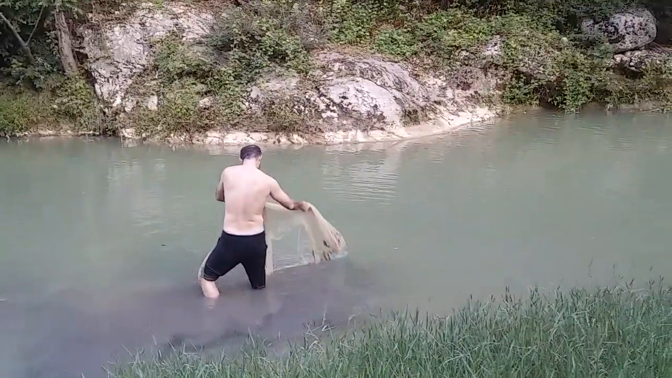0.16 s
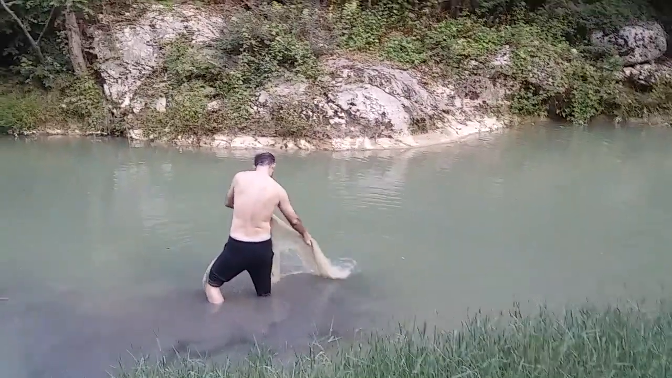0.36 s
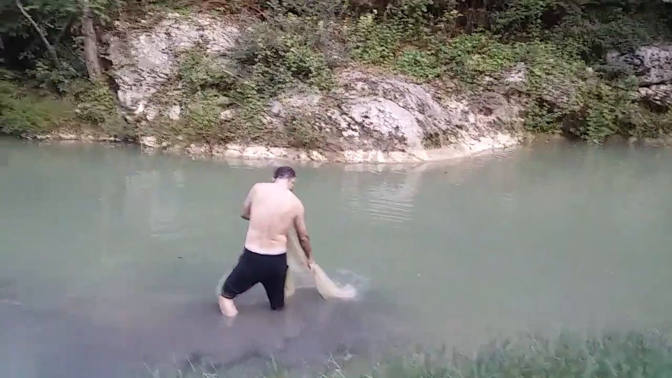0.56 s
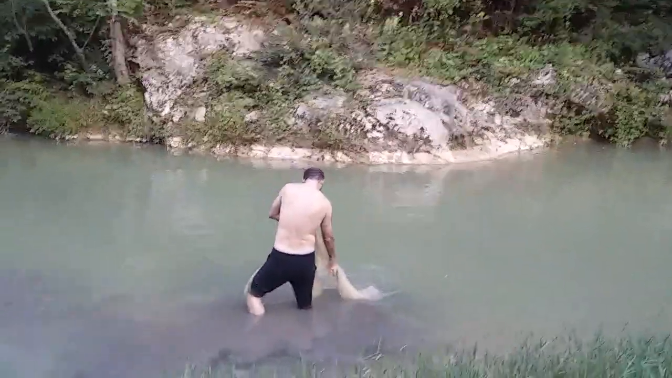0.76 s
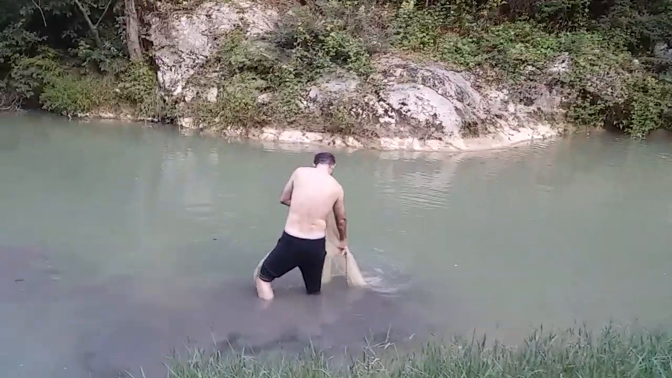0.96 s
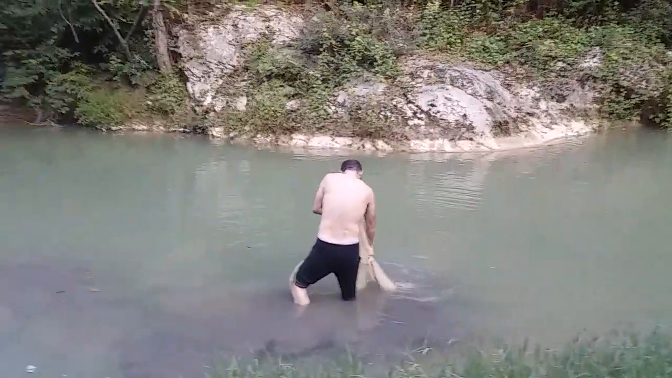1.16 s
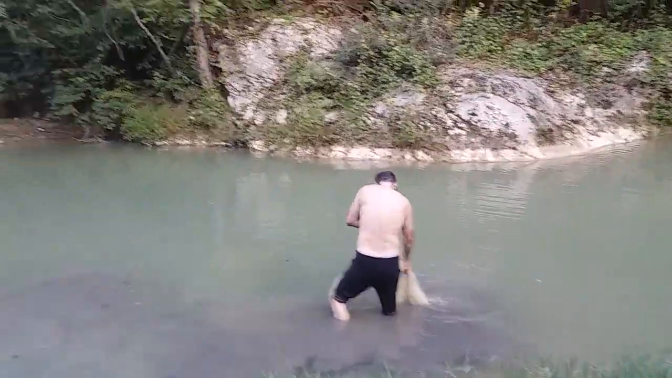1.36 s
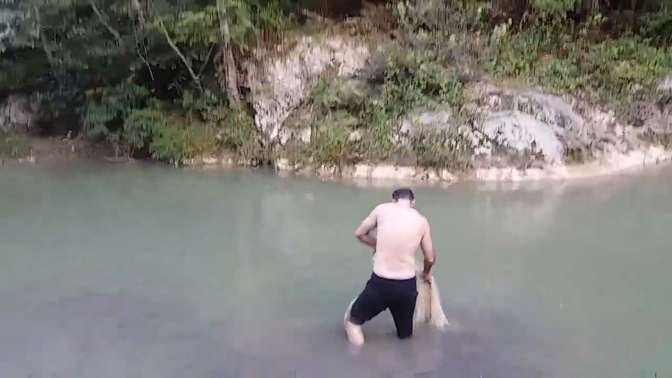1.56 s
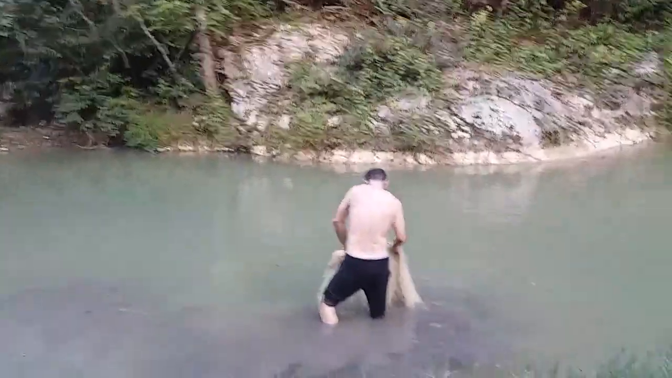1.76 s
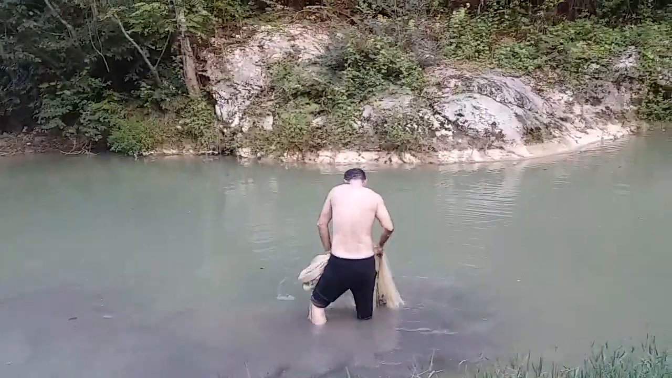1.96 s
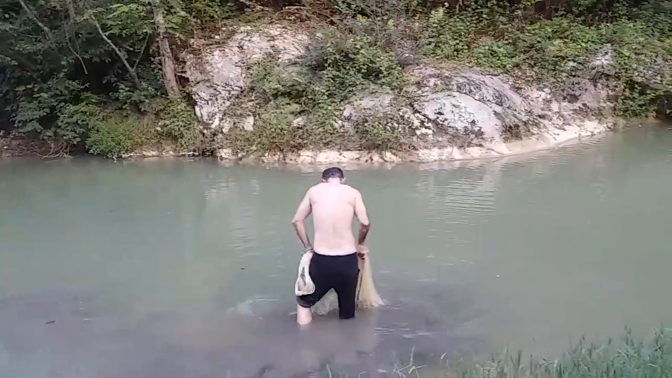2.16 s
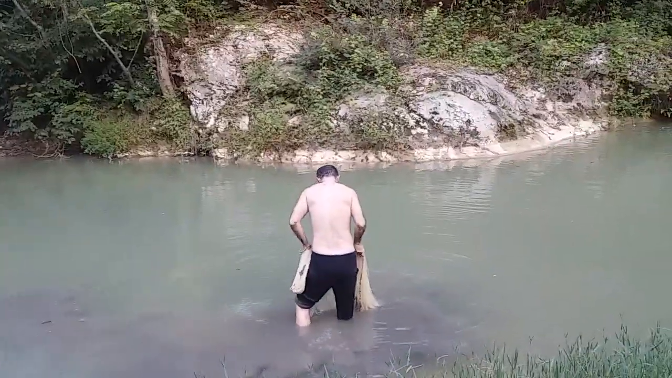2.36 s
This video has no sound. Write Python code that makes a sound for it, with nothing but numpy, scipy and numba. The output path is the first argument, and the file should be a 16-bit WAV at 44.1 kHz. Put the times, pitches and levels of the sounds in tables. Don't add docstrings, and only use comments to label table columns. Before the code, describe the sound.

Water splashing and fizzing as a man wades in a shallow stream with a wet net

```python
import sys
import numpy as np
from scipy import signal
from scipy.fft import rfft, irfft
from scipy.io import wavfile
from scipy.ndimage import uniform_filter1d
from numba import njit

SR = 44100
rng = np.random.default_rng(int(sys.argv[2]) if len(sys.argv) > 2 else 0)


def unload_wav(signal):
    wavfile.write(
        sys.argv[1],
        SR,
        np.round(np.clip(np.atleast_2d(signal).T, -1, 1) * 32767).astype(np.int16),
    )


def elevation(decibels):
    levels = np.asarray(decibels, float)
    return 10 ** (levels / 20)


N = 108045

# (time [s], level [dB], bubble pitch [Hz], crackle [dB])
SURGES_EARLY = [
    [(0, -47.5, 1660, -5.5), (.12, -51, 2600, -6.5), (.22, -49, 2330, -2.5), (.32, -44, 2900, -5.5),
     (.405, -36, 2840, -5), (.42, -46, 2210, -0.5), (.497, -39.5, 2240, 11), (.525, -46, 1780, 6.5),
     (.546, -30.5, 2250, 2)],
    [(.559, -44, 1900, 2.5), (.62, -52, 1970, 4), (.64, -48, 1660, 7), (.775, -51, 1880, 12.5),
     (.8, -59, 2040, 16), (.91, -48.5, 1930, 5.5), (.97, -54.5, 2040, -3)],
]
SURGES_LATE = [
    [(1.45, -51.5, 1060, -6.5), (1.5, -44.5, 1060, -3), (1.54, -52, 1210, -10), (1.67, -43, 1970, 1),
     (1.74, -48, 2160, 1), (1.758, -35, 2300, 2.5), (1.802, -35.5, 2250, -1.5), (1.82, -56, 2150, 6),
     (1.92, -53.5, 2030, 3)],
    [(1.96, -47.5, 2740, -1.5), (2.022, -46, 2770, 1), (2.03, -42, 3340, -4), (2.09, -37, 1930, 8.5),
     (2.15, -44.5, 1530, 1), (2.16, -52, 1790, 7), (2.27, -53.5, 1760, -5), (2.45, -54.5, 1780, -4)],
]
FIZZ_PER_S, FIZZ_CYCLES, FIZZ_SPREAD_OCT, FIZZ_SCATTER_DB, FIZZ_GLIDE = 4000, 5.85, 0.416, 1.2, 0.26
CRACKLE_PER_S, CRACKLE_DB, CRACKLE_SCATTER_DB, CRACKLE_DECAY_S = 1600, -3, -3.5, 0.0009

# (time [s], level [dB])
MIST_LEVEL = [(0, -39.5), (.1, -47.5), (.24, -38), (.33, -31), (.41, -21), (.43, -38), (.56, -54),
              (.7, -84)]
MIST_LOW_HZ, DRIP_HZ, DRIP_DB = 12600, 5000, -26

# (frequency [Hz], density [dB per Hz])
STREAM_LOW = [(30, -15), (62, -2), (120, -2.5), (250, -10), (400, -11.5), (630, -3), (1200, -0.5),
              (2000, 0.5)]
STREAM_HIGH = [(3200, -6), (5100, -8), (5700, -23), (6250, -10.5), (9000, -21), (16000, -22)]
STREAM_DB, SWELL_DB, FLICKER_DB, TRICKLE_DB = -51, 0.5, 1.5, -11.5

# (time [s], peak [dB], pitch [Hz])
LONE_BUBBLES = [(.028, -34.5, 3850), (.032, -34, 1300), (.045, -37, 4940), (.072, -33.5, 5200),
                (.1355, -37, 3600), (.1413, -31.5, 4600), (.1485, -29.5, 4350), (.1615, -35, 5400),
                (.168, -40, 3030), (.205, -34.5, 1360), (.233, -35, 3220), (.2405, -30, 4700),
                (.241, -35, 1000), (.2663, -31, 5000), (.2735, -36, 5600), (.2817, -32, 5100),
                (.293, -35, 2380), (.304, -27.5, 5060), (.3325, -29.5, 3500), (.3385, -25.5, 4700),
                (.34, -29, 1320), (.344, -34, 1410), (.346, -37, 4300), (.354, -48, 3000),
                (.3745, -32.5, 3100), (.3785, -32, 3600), (.385, -26, 3230), (.394, -35, 2540),
                (.401, -42, 2700), (.404, -40, 3500), (.445, -37, 3500), (.456, -33, 1220),
                (.483, -34, 7600), (.4895, -29, 3100), (.9685, -46, 3880), (1.425, -43, 3300),
                (1.56, -44, 3230), (1.7615, -27, 2903), (1.7665, -22, 3250), (1.7685, -32, 3300),
                (1.779, -23, 2370), (1.789, -24, 2790), (1.8005, -32, 1730), (1.8105, -28, 3240),
                (1.826, -35, 1900), (2.0315, -20.5, 3350), (2.049, -30, 3050), (2.052, -28, 3350),
                (2.062, -22, 3600), (2.078, -27, 1700), (2.087, -30, 1010), (2.113, -30, 1970),
                (2.125, -28.5, 1420), (2.14, -28, 3400), (2.1475, -29, 1390), (2.208, -37, 1900),
                (2.24, -35, 2060), (2.294, -41, 3400), (2.375, -38, 3150)]
LONE_CYCLES, LONE_GLIDE = 8.4, 0.077
RISE_SHARE = 0.23

# (time [s], peak [dB], bubble pitch [Hz], smack [dB])
DROPS_EARLY = [(0.0712, -29.5, 1460, -39.5), (0.1451, -23.5, 4400, -8.5), (0.3236, -24, 3770, -24),
               (0.3686, -22, 4230, -14), (0.3824, -38, 3040, -12), (0.4942, -18, 1690, -3.5),
               (0.5145, -41, 3500, 10), (0.5284, -26, 1410, -5), (0.5365, -27, 3060, -1),
               (0.5405, -19.5, 3250, 4), (0.5447, -15, 2440, 4.5), (0.5538, -16.5, 2070, 2),
               (0.6279, -44, 3210, 11.5), (0.64, -23.5, 2900, 0), (0.6473, -23.5, 1500, 2),
               (0.6558, -21.5, 3400, 2), (0.6634, -35, 1200, 12), (0.674, -29.5, 1790, 13),
               (0.6826, -25.5, 1820, 11.5), (0.7, -28, 2020, 9.5), (0.7106, -38, 3130, 16),
               (0.7218, -24.5, 4800, 7), (0.7287, -39, 5000, 3), (0.7321, -30.5, 3580, 8),
               (0.7404, -48, 2990, 13), (0.7451, -26.5, 4500, 5.5), (0.7697, -27.5, 2700, 6),
               (0.7739, -32.5, 2880, 6.5)]
DROPS_LATE = [(0.777,-28,2800,0),(0.7848,-40,3000,14),(0.8125,-40,2900,6),(0.83,-36,3300,5),(0.8,-33.5,1850,9.5),(0.843,-34,2010,15),(0.8537,-31,2420,3),(0.8669,-35,1960,-2),(1.4969,-30.5,1930,-22),(1.5925,-37,3100,2),(1.6078,-37,3800,12.5),(1.6426,-25.5,3060,-0.5),(1.6651,-24.5,1960,-17),(1.669,-31,3800,8),(1.6827,-24,3370,5.5),(1.6915,-31,1630,2),(1.7373,-21.5,3040,-2),(1.7479,-25.5,2900,-7),(1.7532,-27,2840,5),(1.7841,-19.5,2400,-3),(2.0358,-15.5,3780,3),(2.041,-22.5,3250,-5),(2.058,-24.5,3900,8),(2.074,-31,1500,7),(2.0854,-31,3730,2),(2.1075,-26.5,2150,11.5),(2.1253,-22.5,4140,2),(2.1467,-27,3790,9.5),(2.1507,-27,4200,1.5),(2.184,-43,3270,13),(2.1974,-38.5,1840,6)]
DROP_CYCLES, DROP_GLIDE, DROP_DB = 6.0, 0.029, 0.5
SMACK_DECAY_S, SMACK_TILT, SMACK_TOP_HZ = 0.00049, 0.72, 11100

# (time [s], pitch [Hz], level [dB])
AIR_POCKETS = [(0.22, 570, -38.5), (.33, 680, -38), (.372, 470, -34.5), (0.42, 475, -42.5), (1.6, 510, -41),
               (0.83, 860, -43.5), (0.79, 530, -47), (.44, 590, -35), (0.08, 674, -42.5), (0.85, 780, -44),
               (2.23, 880, -52)]
GURGLE_CYCLES, GURGLE_GLIDE = 5.5, 0.21

# (time [s], length [s], start pitch [Hz], end pitch [Hz], level [dB])
BIRD_CALLS = [
    (0.988, 0.11, 3300, 3090, -51),
    (1.0, .07, 6900, 6500, -67),
    (1.149, 0.046, 7500, 7260, -62),
    (1.185, 0.086, 6800, 7600, -63.5),
    (1.14, 0.102, 6500, 6300, -64),
    (1.283, 0.074, 6700, 6270, -61.5),
    (1.33, .07, 7300, 7600, -68),
]

PLUNGE_S, PLUNGE_HZ, PLUNGE_DB, PLUNGE_CYCLES = 1.647, 120.7, -39.5, 3.1
BANK_T60_S, BANK_DB = 0.031, -8

# (frequency [Hz], gain [dB])
PHONE_RESPONSE = [(2200, -7), (3400, -3.5), (5000, -5.5), (7400, 2), (8350, -2.5), (9300, -20.5),
                  (12500, -17), (15800, -16.5)]
# (frequency [Hz], level [dB])
CIRCUIT_WHINE = [(14589, -76.5)]
NEAR_LOW_HZ, RUMBLE_CUT_HZ, TOP_HZ = 467, 48, 15750


def level(x, db):
    return x * elevation(db) / np.sqrt(np.mean(x ** 2))


def butter(x, order, hz, kind="low"):
    return signal.sosfilt(signal.butter(order, hz, kind, fs=SR, output="sos"), x)


def colour(x, table):
    hz, db = np.array(table).T
    log_hz = np.log(np.maximum(np.arange(4097) * SR / 8192, 1))
    cepstrum = irfft(np.interp(log_hz, np.log(hz), db) * np.log(10) / 20)
    cepstrum[1:4096] *= 2
    cepstrum[4097:] = 0
    impulse = irfft(np.exp(rfft(cepstrum)))[:6000]
    return signal.fftconvolve(x, impulse)[:N]


def walk(rate_hz):
    hold = int(SR / rate_hz)
    steps = np.repeat(rng.standard_normal(N // hold + 1), hold)
    return 1.3 * uniform_filter1d(uniform_filter1d(steps, hold), hold)[:N]


@njit
def grains(n, start, step, cycles, size, glide):
    y = np.zeros(n)
    for k in range(len(start)):
        fade = np.exp(-step[k] / cycles[k])
        up = 1 + glide * step[k] / cycles[k] / 3
        phase, w, a = 0., step[k], size[k]
        for i in range(start[k], min(n, start[k] + int(6 * cycles[k] / step[k]))):
            y[i] += a * np.sin(phase)
            phase += w
            a *= fade
            w = min(w * up, 2.8)
    return y


def bubbles(s, hz, cycles, db, glide):
    one = np.ones(len(s))
    start = (s * SR).astype(np.int64)
    step = np.clip(hz * one, 30, 16000) * 2 * np.pi / SR
    return grains(N, start, step, np.maximum(cycles, .3) * 2 * one, elevation(db) * one, 1. * glide)


def rings(s, hz, cycles, db, glide):
    slow = bubbles(s, hz, cycles, db + 5, glide)
    return slow - bubbles(s, hz, cycles * RISE_SHARE, db + 3, glide * RISE_SHARE)


def swarm(per_s, hz, spread_oct, cycles, scatter_db, glide):
    when, u, v, size = rng.random((4, int(np.ceil(per_s * N / SR))))
    s = when * N / SR
    bell = np.sqrt(-2 * np.log(u + 1e-9)) * np.cos(2 * np.pi * v)
    pitch = hz[(s * SR).astype(int)] * 2 ** (spread_oct * bell)
    db = 3 * np.log2(pitch) - scatter_db * np.log(size + 0.0049)
    return level(bubbles(s, pitch, cycles, db, glide), 0)


def crackle(per_s, scatter_db):
    when, size = rng.random((2, N))
    hits = (when < per_s / SR) * elevation(-scatter_db * np.log(size + .01))
    envelope = signal.lfilter([1], [1, -np.exp(-1 / SR / CRACKLE_DECAY_S)], hits)
    return level(envelope * rng.standard_normal(N), 0)


def churn(t):
    s, db, hz, crackle_db = np.vstack(SURGES_EARLY + SURGES_LATE).T
    pitch = np.interp(t, s, hz)
    fizz = swarm(FIZZ_PER_S, pitch, FIZZ_SPREAD_OCT, FIZZ_CYCLES, FIZZ_SCATTER_DB, FIZZ_GLIDE)
    snap = crackle(CRACKLE_PER_S, CRACKLE_SCATTER_DB) * elevation(CRACKLE_DB + np.interp(t, s, crackle_db))
    boil_db = 1.5 * walk(45)
    return (fizz + snap) * elevation(np.interp(t, s, db) + boil_db)


def mist(t):
    patter = butter(crackle(2500, 0.65), 6, MIST_LOW_HZ, "high")
    drips = elevation(DRIP_DB) * swarm(130, DRIP_HZ + 0 * t, 0.2, 9.7, 2.5, 0.069)
    return (patter + drips) * elevation(np.interp(t, *np.array(MIST_LEVEL).T))


def stream(t):
    spectrum = rfft(rng.standard_normal(N))
    octaves = np.log2(np.arange(N // 2 + 1) * SR / N + 1)
    hiss, swell_db = 0, SWELL_DB * walk(0.99)
    for centre in np.arange(4, 14.6, .5):
        window = np.cos(np.pi * np.clip(octaves - centre, -.5, .5)) ** 2
        hiss = hiss + irfft(spectrum * window, N) * elevation(swell_db + FLICKER_DB * walk(15))
    trickle = elevation(TRICKLE_DB) * swarm(500, 2100 + 0 * t, .7, 7.0, 3.0, .3)
    return level(colour(hiss + trickle, STREAM_LOW + STREAM_HIGH), STREAM_DB)


def lone_bubbles():
    s, db, hz = np.array(LONE_BUBBLES).T
    return rings(s, hz, LONE_CYCLES * np.sqrt(hz / 3500), db, LONE_GLIDE)


def drops():
    s, db, hz, smack_db = np.vstack([DROPS_EARLY, DROPS_LATE]).T
    db = db + DROP_DB
    out = rings(s, hz, DROP_CYCLES * np.minimum(hz / 3000, 1), db, DROP_GLIDE)
    i = np.arange(256)
    smack = rng.standard_normal((len(s), len(i))) * np.exp(-i / SR / SMACK_DECAY_S)
    smack = smack / np.abs(smack).max(axis=1, keepdims=True) * 2
    smack = signal.lfilter([1, -SMACK_TILT], [1], smack) * elevation(db + smack_db)[:, None]
    smack = butter(smack, 2, SMACK_TOP_HZ)
    np.add.at(out, (s * SR).astype(int)[:, None] + i, smack)
    return out


def gurgles():
    s, hz, db = np.repeat(AIR_POCKETS, 3, axis=0).T
    delay, detune = rng.random((2, len(s)))
    return bubbles(s + 0.039 * delay, hz * (0.884 + 0.3 * detune), GURGLE_CYCLES, db, GURGLE_GLIDE)


def birds(t):
    out = 0
    for s, length, hz0, hz1, db in BIRD_CALLS:
        u = np.clip((t - s) / length, 0, 1)
        hz = (hz0 + (hz1 - hz0) * u) * (1 + .026 * walk(300))
        envelope = elevation(db + 2.7 * walk(120)) * np.sin(np.pi * u)
        out = out + envelope * np.sin(2 * np.pi * np.cumsum(hz) / SR)
    return out


def plunge():
    s = np.array([PLUNGE_S, PLUNGE_S + 0.0077])
    return bubbles(s, np.array([PLUNGE_HZ, 260]), PLUNGE_CYCLES, PLUNGE_DB, 0.041)


def bank_echo(x):
    t = np.arange(6000) / SR
    tail = rng.standard_normal(len(t)) * 1000 ** (-t / BANK_T60_S)
    return signal.fftconvolve(x, level(tail, BANK_DB - 10 * np.log10(len(t))))[:N]


def scene():
    t = np.arange(N) / SR
    near = churn(t) + mist(t) + lone_bubbles() + drops() + gurgles()
    near = butter(near, 4, NEAR_LOW_HZ, "high")
    return (near + bank_echo(near) + plunge() + birds(t) + stream(t))[None]


def low_pass(x):
    return signal.sosfilt(signal.butter(12, 16650, fs=SR, output="sos"), x)


def record(dry):
    (hz, db), = CIRCUIT_WHINE
    whine = np.sqrt(2) * elevation(db) * np.sin(2 * np.pi * hz * np.arange(N) / SR)
    x = colour(dry[0], PHONE_RESPONSE) + whine
    x = signal.sosfilt(signal.ellip(8, .2, 60, TOP_HZ, fs=SR, output="sos"), x)
    x = butter(x, 2, RUMBLE_CUT_HZ, "high")
    return low_pass(x[None])


dry = scene()
out = record(dry)
unload_wav(out)
```